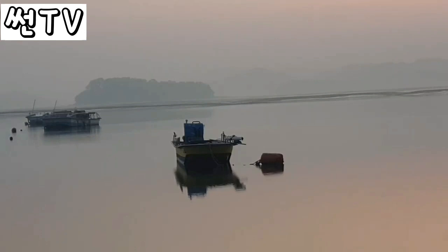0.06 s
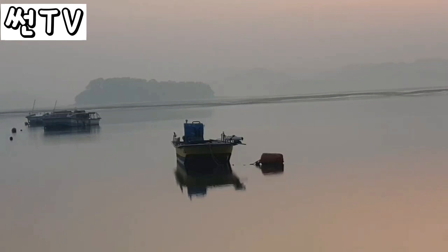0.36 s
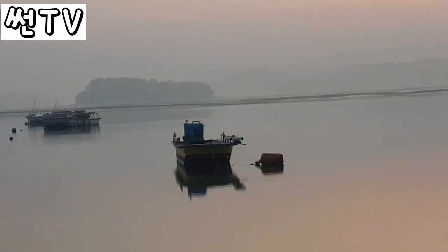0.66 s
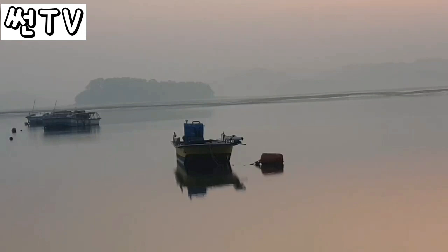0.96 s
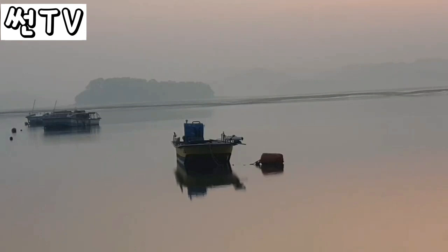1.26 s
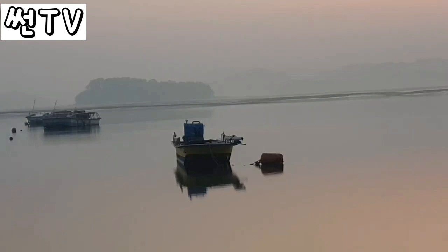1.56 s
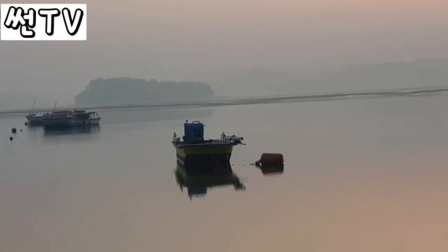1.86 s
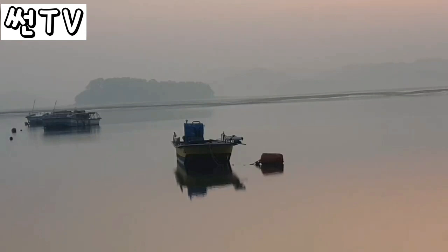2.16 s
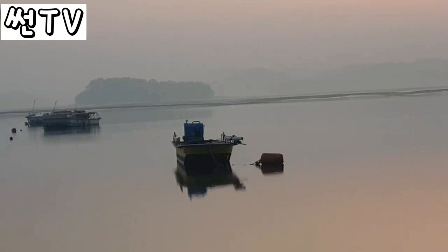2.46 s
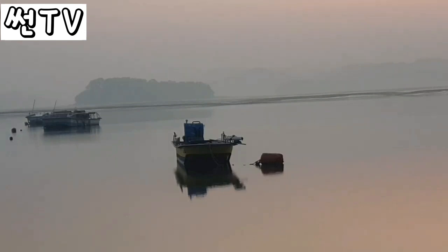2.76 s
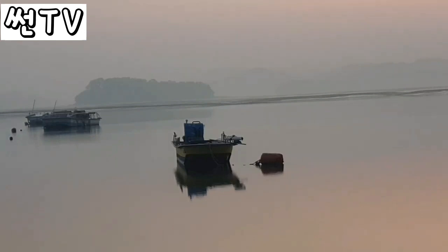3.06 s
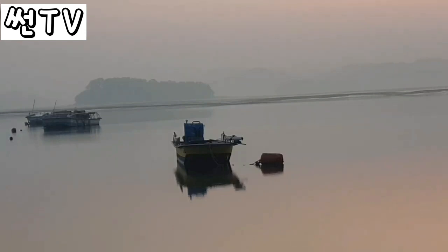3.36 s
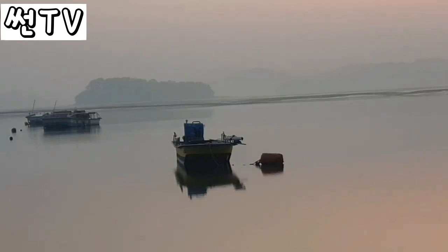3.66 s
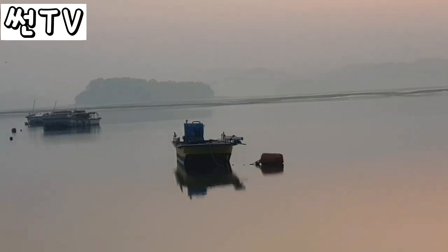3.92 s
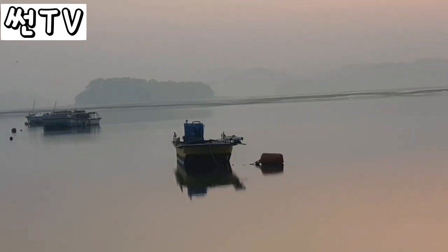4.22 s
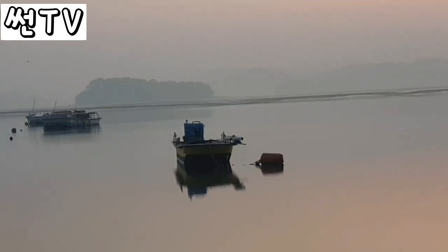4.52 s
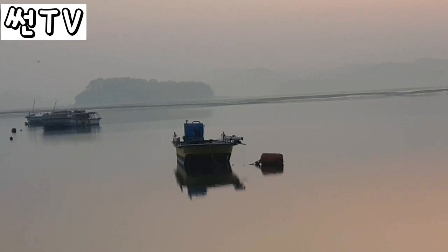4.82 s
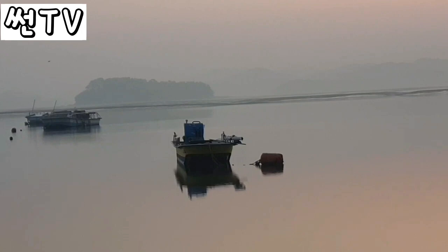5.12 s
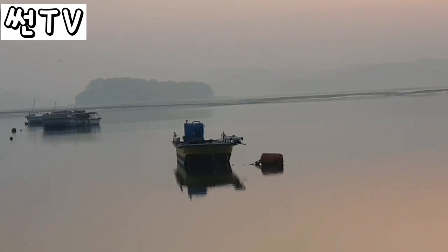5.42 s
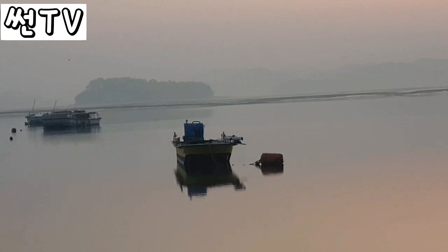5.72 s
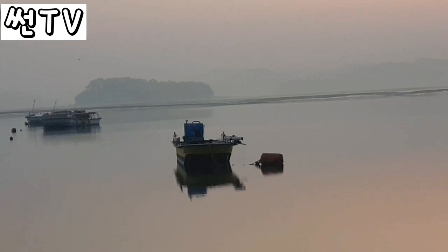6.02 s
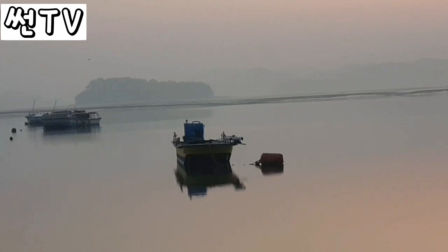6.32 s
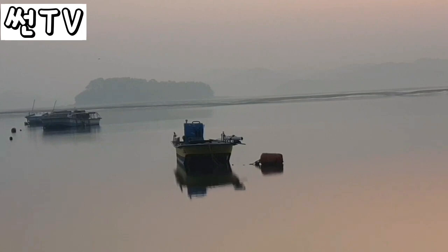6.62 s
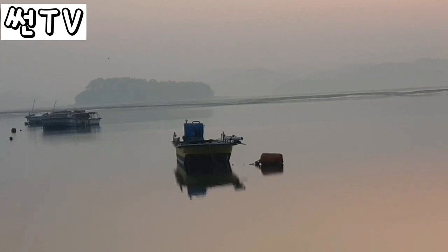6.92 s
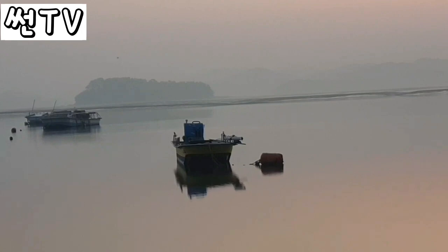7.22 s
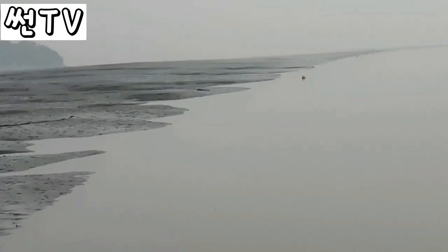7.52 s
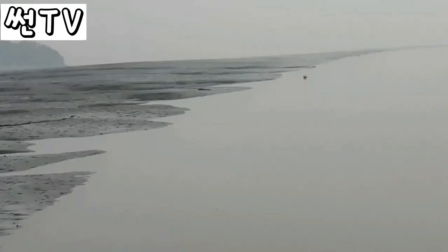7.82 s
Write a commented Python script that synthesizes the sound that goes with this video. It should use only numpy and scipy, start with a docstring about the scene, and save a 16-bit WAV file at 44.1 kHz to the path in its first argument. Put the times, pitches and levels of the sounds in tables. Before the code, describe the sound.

Distant boat engines drone with a low throb over calm water, while small birds chirp faintly and two dull thuds roll in from afar.

```python
"""Far boat engines drone on a calm tidal inlet at dawn; the two loudest beat six times a second.
Under them lie a low outdoor rumble and a wash of far noise. Small birds whistle, buzz and chip,
and the bank echoes the whistles; a gull and a wader each call once. Two dull thuds roll across
the water. Close by, a soft hiss swells and fades, and there is one light knock."""
import sys
import numpy as np
from scipy import signal
from scipy.fft import rfft, irfft, next_fast_len
from scipy.io import wavfile
from scipy.ndimage import map_coordinates

SR = 44100
rng = np.random.default_rng(int(sys.argv[2]) if len(sys.argv) > 2 else 0)


def persist_wave(psi):
    """Save psi, clipped to +-1, as 16-bit WAV."""
    counts = np.round(np.clip(psi, -1, 1) * 32767).astype(np.int16)
    wavfile.write(sys.argv[1], SR, np.atleast_2d(counts).T)


N = 356328
TIME = np.arange(N) / SR
FAR_LAG_S, BIRD_LAG_S = 0.00049, 0.00006  # left channel behind right

# Stereo balance of engines and noise. Each row: frequency in Hz, left minus right in dB.
BALANCE_DB = [(60, 0.5), (110, 1.5), (200, 1), (380, -1), (690, -2.0), (1280, -5), (2360, 1), (4350, -2),
              (8020, 0), (14800, 1)]


def amp(db):
    """Decibels to gain."""
    return 10 ** (np.asarray(db) / 20)


def unit(x):
    """Scale to rms 1."""
    return x / np.sqrt(np.mean(x ** 2) + 1e-20)


def along(points, hz):
    """Interpolate (Hz, value) points on a log frequency axis."""
    point_hz, values = np.transpose(points)
    return np.interp(np.log(hz + 1), np.log(point_hz + 1), values)


def curve(points):
    """Interpolate (s, value) points at every sample."""
    return np.interp(TIME, *np.transpose(points))


def wobble(rate_hz, size=N):
    """Smooth random curve with rate_hz knots a second."""
    knots = rng.standard_normal(int(size * rate_hz / SR) + 4)
    return map_coordinates(knots, [np.arange(size) * rate_hz / SR])


def swells(rows):
    """Summed gain of events that rise linearly and decay exponentially."""
    gain = 0
    for start_s, db, rise_s, t60_s in rows:
        age_s = np.maximum(TIME - start_s, 0)
        decay_db = 60 * np.maximum(age_s - rise_s, 0) / t60_s
        gain = gain + np.minimum(age_s / rise_s, 1) * amp(db - decay_db)
    return gain


def add(track, start_s, sound):
    """Mix a sound in at start_s, no earlier than 0."""
    part = track[..., max(round(start_s * SR), 0):][..., :sound.shape[-1]]
    part += sound[..., :part.shape[-1]]


def filtered(x, response):
    """Apply a frequency response, given as a function of Hz."""
    size = next_fast_len(N + SR // 2)
    return irfft(rfft(x, size) * response(np.fft.rfftfreq(size, 1 / SR)), size)[..., :N]


def panned(db):
    """Constant-power stereo gains for left minus right in dB."""
    gains = amp(np.array([np.atleast_1d(db), -np.atleast_1d(db)]) / 2)
    return gains / np.sqrt(np.mean(gains ** 2, axis=0))


def lag_response(hz, lag_s):
    """Stereo phase factors that put left lag_s behind right."""
    return np.exp(np.array([[-1j], [1j]]) * np.pi * hz * lag_s)


def placed(x, lag_s):
    """Apply the stereo balance and a left-channel lag."""
    return filtered(x, lambda hz: panned(along(BALANCE_DB, hz)) * lag_response(hz, lag_s))


def air_noise(spectrum, lag_s=FAR_LAG_S):
    """Stereo noise of rms 1 from (Hz, relative dB) points: coherent bass, diffuse treble."""
    # Each row: frequency in Hz, left-right correlation.
    correlation = [(80, 1), (170, 0.98), (320, 0.75), (800, 0.83), (1200, 0.63), (1600, 0.67), (2500, 0),
                   (10000, 0.008)]

    def mid_side(hz):
        angle = np.arccos(np.clip(along(correlation, hz), -1, 1)) / 2
        return amp(along(spectrum, hz)) * [np.cos(angle), np.sin(angle)]
    mid, side = filtered(rng.standard_normal((2, N)), mid_side)
    return unit(placed(np.array([mid + side, mid - side]), lag_s))


def ambience(deep_db=-47.5, hiss_db=-76):
    """Deep rumble and a wash of far noise whose upper edge comes and goes, over a thin hiss."""
    # Band spectra. Each row: frequency in Hz, relative density in dB.
    deep_spectrum = [(20, -27), (32, -6), (45, 1.5), (70, 7.5), (100, 4), (125, -4.5), (170, -22.5),
                     (300, -53.5)]
    rumble_spectrum = [(40, -23), (80, -7), (115, 0), (150, -2), (200, -7.5), (280, -13.5), (400, -21),
                       (700, -33), (1500, -73)]
    wash_spectrum = [(150, -32), (330, -8.5), (500, -2), (620, 0), (800, -1.5), (1030, -2), (1300, -16),
                     (1550, -33.5), (1850, -37), (3000, -70.5)]
    edge_spectrum = [(700, -32), (1080, 1.5), (1300, 0.5), (1480, -2.5), (1620, -10), (1800, -18.5),
                     (2400, -21), (3200, -29.5), (5000, -39), (9000, -61.5)]
    hiss_spectrum = [(500, 1), (2100, 10.5), (3200, 4.5), (4400, 2.5), (6000, -4), (8500, -31), (10000, 0),
                     (12000, 3), (15000, 3.5)]
    # Slow band drift. Each row: time in seconds, relative level in dB.
    rumble_drift = [(0.0, -53.5), (0.49, -54), (0.61, -56), (1.75, -50.5), (3.13, -54), (3.35, -52),
                    (5.15, -57.5), (8.08, -54.5)]
    wash_drift = [(0.0, -56.5), (0.79, -60.5), (3.56, -60.5), (3.69, -62), (4.66, -61), (4.93, -61.5),
                  (5.36, -63), (6.08, -63), (7.04, -64.5), (8.08, -62)]
    edge_drift = [(0.0, -74.5), (0.67, -81.5), (0.97, -77), (1.89, -74), (2.27, -70), (3.42, -70.5),
                  (4.12, -76.5), (4.99, -77.5), (5.2, -70.5), (5.83, -74), (6.1, -77.5), (7.0, -77),
                  (8.08, -70)]
    deep = amp(deep_db + 0.21 * wobble(4.8)) * air_noise(deep_spectrum)
    rumble = amp(curve(rumble_drift) + 4.5 + 0.63 * wobble(5)) * air_noise(rumble_spectrum)
    wash = amp(curve(wash_drift) + 5.0 + 0.97 * wobble(9)) * air_noise(wash_spectrum)
    edge = amp(curve(edge_drift) + 5.5 + 1.7 * wobble(13)) * air_noise(edge_spectrum)
    hiss = amp(hiss_db) * air_noise(hiss_spectrum, lag_s=0)
    return deep + rumble + wash + edge + hiss


def swish():
    """A soft, bright hiss nearby swells twice and fades."""
    # Each row: start in seconds, level in dB, rise and t60 in seconds.
    strokes = [(4.692, -73, .04, 5.2), (5.07, -67, 0.14, 1.1)]
    spectrum = [(600, -17.0), (1800, 0.5), (3000, 4.5), (5000, 3.5), (6300, 1.0), (7800, 4.0),
                (10000, 0.0), (15000, -2.0)]
    return swells(strokes) * air_noise(spectrum, lag_s=0)


def knock(start_s=6.7215, attack_s=0.002):
    """A light, hollow tap nearby rings a few well-damped modes."""
    # Each row: frequency in Hz, level in dB, t60 in seconds.
    modes = [(360, -39, .04), (560, -52, .025), (790, -47, .03), (1070, -47.5, .04), (1720, -68, .025)]
    age_s = np.maximum(TIME - start_s, 0)
    ring = sum(amp(db - 60 * age_s / t60_s) * np.sin(2 * np.pi * hz * age_s) for hz, db, t60_s in modes)
    return panned(0) * (1 - np.exp(-age_s / attack_s)) * ring


def thuds():
    """Two far, heavy blows roll over the water; the first starts with a scuff."""
    # Each row: start in seconds, level in dB, rise and t60 in seconds.
    blows = [(1.605, -38.5, 0.04, 0.53), (3.28, -38.5, 0.083, 0.84)]
    scuffs = [(1.595, -54.5, 0.035, 0.24)]
    # Each row: frequency in Hz, relative density in dB.
    blow_spectrum = [(40, -30.5), (90, -23), (145, 6), (195, -3), (300, -20.5), (450, -17.5), (900, -28),
                     (1500, -43.5), (4000, -72)]
    scuff_spectrum = [(200, -13), (400, 9), (1000, 4.5), (1600, -7.5), (2350, -6.0), (2600, -22),
                      (9000, -42), (14000, -56)]
    scuff = swells(scuffs) * air_noise(scuff_spectrum)
    return swells(blows) * air_noise(blow_spectrum) + scuff


def shore(x, tail_db):
    """The shore adds a diffuse tail whose treble dies first."""
    # Each row: frequency in Hz, t60 in seconds.
    decay = [(1000, 0.72), (2500, 0.7), (4000, 0.4), (9000, 0.15)]
    hz, age_s, noise = signal.stft(rng.standard_normal((2, SR)), SR, nperseg=256)
    tail = signal.istft(noise * amp(-60 * age_s / along(decay, hz)[:, None]), SR, nperseg=256)[1]
    wet = signal.fftconvolve(x, tail / np.linalg.norm(tail[0]), axes=1)[:, :N]
    return x + amp(tail_db) * wet


def glide(length_s, pitches_hz):
    """Polynomial pitch contour through evenly spaced points."""
    contour = np.polyfit(np.linspace(0, 1, len(pitches_hz)), pitches_hz, len(pitches_hz) - 1)
    return np.polyval(contour, np.linspace(0, 1, int(length_s * SR)))


def note(length_s, pitches_hz, db, rasp, peak=0.55, trill=0, level_jitter_db=2.5):
    """A sine bird note with slight random level and pitch roughness."""
    # rasp and trill are shares of the pitch, peak is a share of the length.
    rasp_hz, trill_hz, level_jitter_hz = 900, 36.2, 170
    pitch_hz = glide(length_s, pitches_hz)
    size = len(pitch_hz)
    pitch_hz *= 1 + rasp * wobble(rasp_hz, size) + trill * np.sin(2 * np.pi * trill_hz * TIME[:size])
    skew = np.log(0.5) / np.log(peak)
    swell = unit(np.abs(np.sin(np.pi * np.linspace(0, 1, size) ** skew)) ** 0.85)
    gain = amp(db + level_jitter_db * wobble(level_jitter_hz, size))
    return gain * swell * np.sqrt(2) * np.sin(2 * np.pi * np.cumsum(pitch_hz) / SR)


def far_birds(pan_db=-4):
    """Farther birds give trilled buzzes, rising slurs and short falling chips."""
    # Each row: start and length in seconds, pitch in Hz, rasp as a share of pitch, level in dB.
    buzzes = [(-0.01, 0.078, 3190, 0.048, -78.5), (0.113, 0.09, 3150, 0.038, -76),
              (0.752, 0.11, 3820, 0.047, -78.5), (4.533, .07, 3980, 0.042, -82.5),
              (5.63, .09, 4500, .12, -88), (5.844, 0.11, 4330, 0.043, -82), (6.5, .05, 4600, .09, -80),
              (7.164, .07, 3950, 0.066, -86), (7.41, .06, 4350, .05, -89)]
    # Each row: start and length in seconds, nominal pitch in Hz, level in dB.
    slurs = [(6.062, .118, 4320, -84), (6.391, 0.14, 4200, -81)]
    # Ratios to the nominal pitch at start, middle and end.
    slur_shape = [0.92, 0.97, 1.15]
    # Each row: start and length in seconds, pitch in Hz, sweep as a share of pitch, level in dB.
    chips = [(0.831, 0.025, 3620, -0.27, -75), (3.536, 0.0075, 5600, -0.22, -79),
             (3.545, 0.0078, 5400, -0.28, -77), (4.393, .022, 4400, -0.3, -80.5),
             (4.446, .02, 4450, -.3, -84)]
    out = np.zeros(N)
    for start_s, length_s, hz, rasp, db in buzzes:
        add(out, start_s, note(length_s, [hz, hz], db, rasp, trill=0.05))
    for start_s, length_s, hz, db in slurs:
        add(out, start_s, note(length_s, hz * np.array(slur_shape), db, rasp=0.02, peak=0.68))
    for start_s, length_s, hz, sweep, db in chips:
        add(out, start_s, note(length_s, [hz * (1 - sweep / 2), hz * (1 + sweep / 2)], db, rasp=0.04))
    return filtered(panned(pan_db) * out, lambda hz: lag_response(hz, BIRD_LAG_S))


def wader(echo_s=0.14, echo_db=-14):
    """A hoarse rising call from the mud flat returns from the far shore."""
    # Each row: start and length in seconds, nominal pitch in Hz, level in dB.
    calls = [(3.957, .078, 2510, -66.5)]
    # Ratios to the nominal pitch from start to end.
    shape = [.83, .98, 1.02, 1.12]
    out = np.zeros(N)
    for start_s, length_s, hz, db in calls:
        call = note(length_s, hz * np.array(shape), db, rasp=0.018, peak=0.5, level_jitter_db=2.0)
        add(out, start_s, call)
        add(out, start_s + echo_s, amp(echo_db) * call)
    return panned(-1) * out


def gull(attack_s=0.02, release_s=0.012, hoarse_rad=0.22):
    """One arched, nasal cry, strongest on harmonic four; phase scatter makes it hoarse."""
    # Each row: start and length in seconds, start, middle and end pitch in Hz, pre-throat level in dB.
    cries = [(2.836, .153, 504, 553, 496, -64.5)]
    # Throat response. Each row: frequency in Hz, gain in dB.
    throat = [(550, -31), (1100, -4.5), (1650, -7), (2200, 0.5), (2750, -20.5), (3350, -40), (3900, -27),
              (4500, -40)]
    out = np.zeros((2, N))
    for start_s, length_s, start_hz, middle_hz, end_hz, db in cries:
        pitch_hz = glide(length_s, [start_hz, middle_hz, end_hz])
        size = len(pitch_hz)
        gate = np.clip(np.minimum(TIME[:size] / attack_s, (length_s - TIME[:size]) / release_s), 0, 1)
        phase = 2 * np.pi * np.cumsum(pitch_hz * (1 + 0.0044 * wobble(300, size))) / SR
        cry = sum(amp(along(throat, k * middle_hz)) * np.sin(k * phase + hoarse_rad * wobble(350, size))
                  for k in range(1, 9))
        add(out, start_s, panned(-1) * amp(db) * gate * np.sqrt(2) * cry)
    return out


def songbirds(bank_delay_s=0.05, bank_pan_db=-4.5):
    """Nearer birds whistle, heard directly and once more off the bank."""
    # Each row: start and length in seconds, six successive pitches in Hz, peak as a share of length,
    # level in dB, left minus right in dB, echo gain in dB.
    whistles = [ (0.165, 0.099, 2960, 3370, 3690, 3870, 3740, 3850, 0.63, -73, 11, 3),
                (0.842, 0.077, 5170, 5100, 4820, 4760, 4950, 5400, 0.45, -77.5, -9, 2.5),
                (0.97, 0.028, 6450, 6500, 6560, 6620, 6700, 6800, 0.6, -77.5, -5, -21),
                (3.08, 0.13, 3890, 3870, 3950, 3973, 3955, 3720, 0.75, -65, 17, -7),
                (3.289, 0.16, 3980, 4030, 4170, 4233, 4250, 3970, 0.7, -62.5, 3, -11.5),
                (3.596, 0.066, 3350, 3710, 3720, 3570, 3430, 3280, 0.54, -68, 15, -4),
                (3.835, 0.043, 5280, 5130, 5000, 4940, 4880, 4800, 0.5, -74.5, -12, -16),
                (4.172, 0.09, 4400, 4760, 4680, 4590, 4700, 4650, 0.62, -70, -8, -11.5),
                (4.475, .04, 2950, 2880, 2840, 2790, 2770, 2760, .5, -83.5, 0, -20),
                (5.88, 0.13, 2160, 2110, 2115, 2100, 2100, 2090, .6, -86, -3, -12),
                (7.315, .045, 3750, 3790, 3820, 3820, 3800, 3770, 0.7, -87.5, 11, -4),
                (7.50, 0.15, 3640, 3800, 3790, 3850, 3790, 3690, 0.76, -74, 18, -12),
                (7.765, 0.165, 3860, 4400, 4940, 5100, 5120, 5170, .6, -89, -3, -6)]
    direct, echo = np.zeros((2, N)), np.zeros(N)
    for start_s, length_s, *pitches_hz, peak, db, pan_db, echo_db in whistles:
        whistle = note(length_s, pitches_hz, db, rasp=0.008, peak=peak)
        add(direct, start_s, panned(pan_db) * whistle)
        add(echo, start_s + bank_delay_s, amp(echo_db) * whistle)
    return filtered(direct, lambda hz: lag_response(hz, BIRD_LAG_S)) + panned(bank_pan_db) * echo


def engines(steady_hz=72.62, swelling_hz=78.55, steady_db=-44.0, in_step_s=0.125):
    """Far engines drone; the two loudest run at nearly one speed and beat against each other."""
    # Weaker engine tones. Each row: frequency in Hz, level in dB, phase drift in cycles.
    tones = [(56.9, -51.5, 0.032), (60.55, -55.5, 0.089), (69.7, -55.5, 0.12), (71.1, -56, 0.15),
             (76.5, -58, .04), (83.9, -58.5, .03), (90.9, -59, .1), (101.23, -50, 0.14),
             (108.8, -61.5, .05), (113.9, -57, 0.073), (132.6, -65, .2), (146.9, -65.5, 0.2),
             (202.6, -60.5, 0.22), (238.5, -71.5, 0.23)]
    # The swelling engine. Each row: time in seconds, level in dB.
    swell = [(0, -44), (.9, -40), (1.55, -41), (2.8, -46.5), (3.9, -39), (4.5, -41), (5.3, -44),
             (6.2, -38.5), (7.25, -45), (7.8, -39.5)]

    def tone(hz, db, drift_cycles, offset_cycles, waver_db):
        cycles = hz * (TIME - in_step_s) + offset_cycles + drift_cycles * wobble(2.015)
        return np.sqrt(2) * amp(db + waver_db * wobble(1.902)) * np.sin(2 * np.pi * cycles)
    shared_cycles = rng.random()
    steady = tone(steady_hz, steady_db, 0.013, shared_cycles, waver_db=0.4)
    swelling = tone(swelling_hz, curve(swell), 0.0083, shared_cycles, waver_db=0.68)
    drone = sum(tone(hz, db, drift, rng.random(), waver_db=1.72) for hz, db, drift in tones)
    return placed(steady + swelling + drone, FAR_LAG_S)


def scene():
    """Everything heard from the water's edge."""
    birds = shore(songbirds(), tail_db=-12.5) + shore(far_birds(), tail_db=-7)
    birds += shore(wader(), tail_db=-8) + shore(gull(), tail_db=-10.5)
    return engines() + ambience() + birds + thuds() + knock() + swish()


def record(dry, fade_s=0.004, cutoff_hz=15450):
    """Click-free fade-in and a brick-wall low-pass."""
    fade_in = np.minimum(TIME / fade_s, 1)
    return filtered(dry * fade_in, lambda hz: hz < cutoff_hz)


dry = scene()
out = record(dry)
persist_wave(out)
```